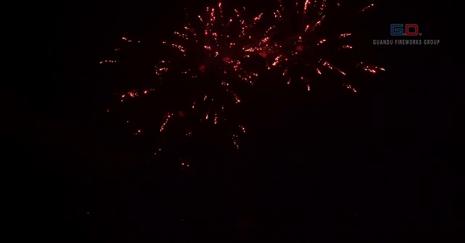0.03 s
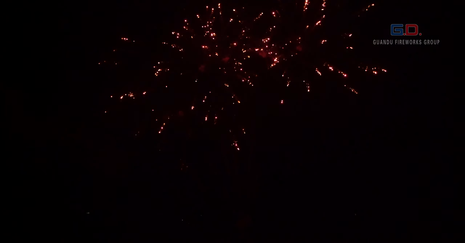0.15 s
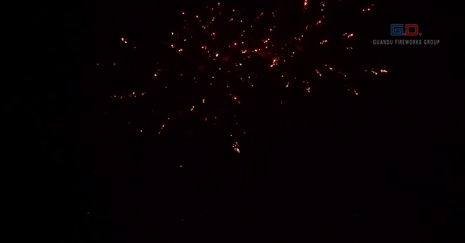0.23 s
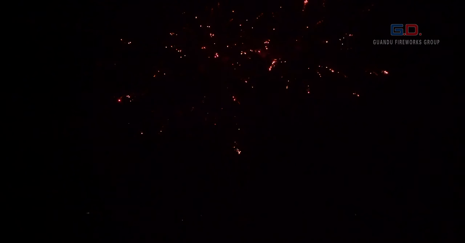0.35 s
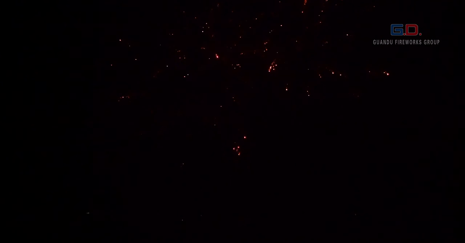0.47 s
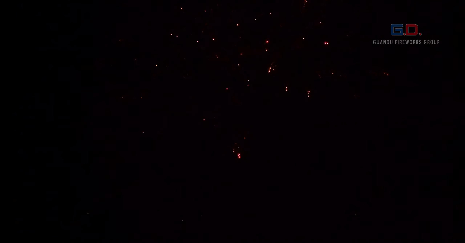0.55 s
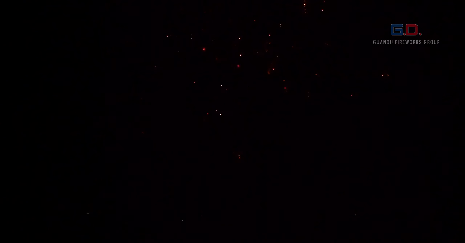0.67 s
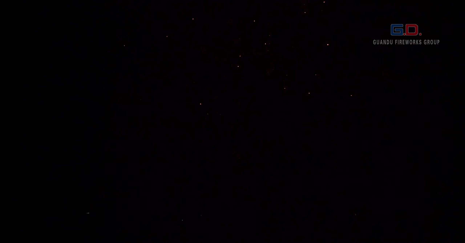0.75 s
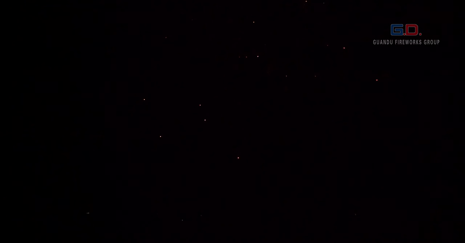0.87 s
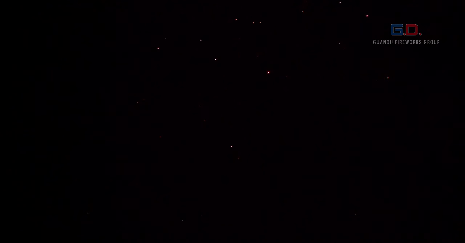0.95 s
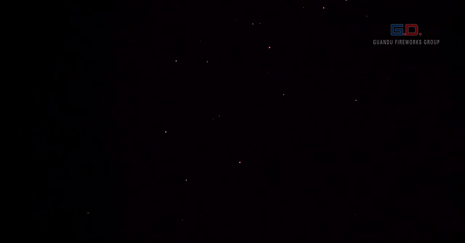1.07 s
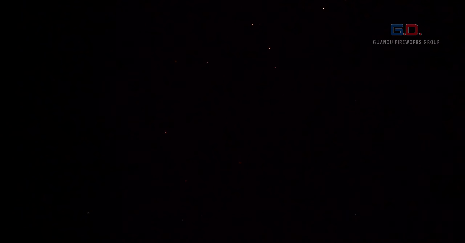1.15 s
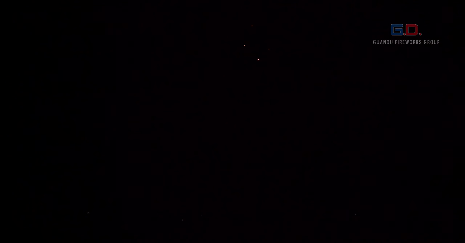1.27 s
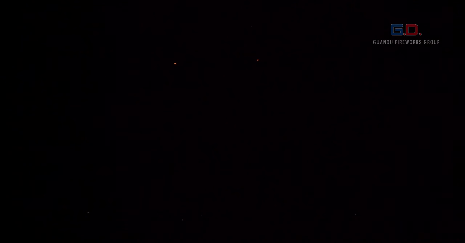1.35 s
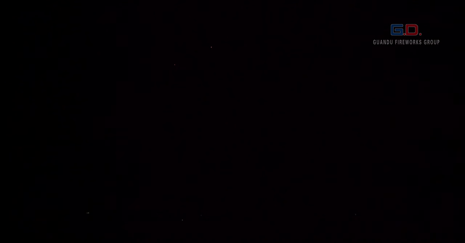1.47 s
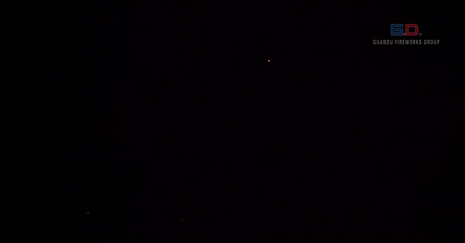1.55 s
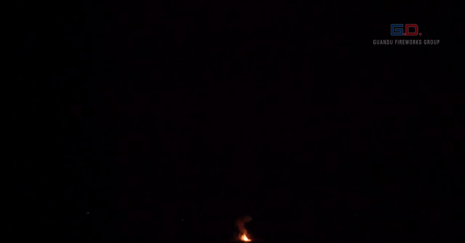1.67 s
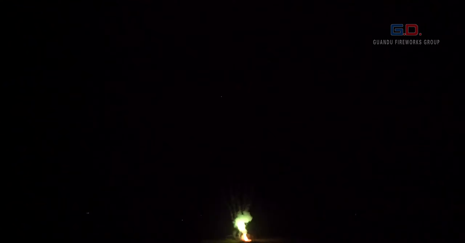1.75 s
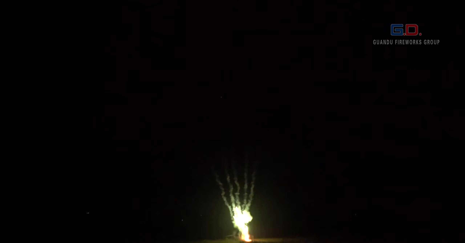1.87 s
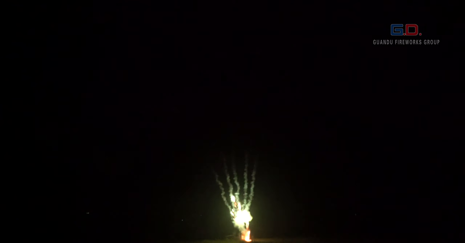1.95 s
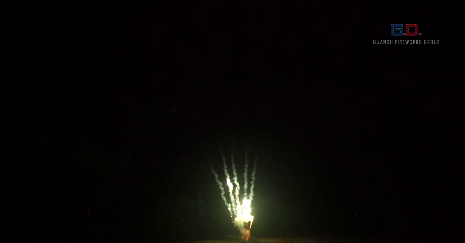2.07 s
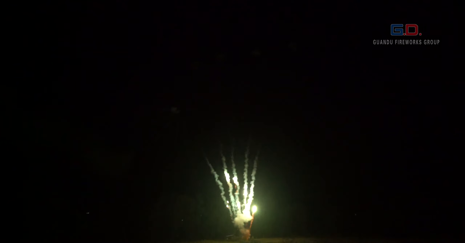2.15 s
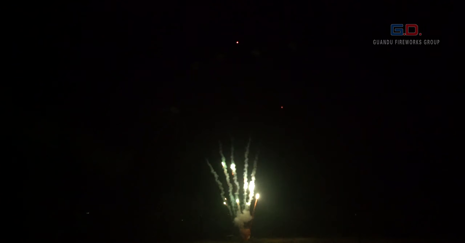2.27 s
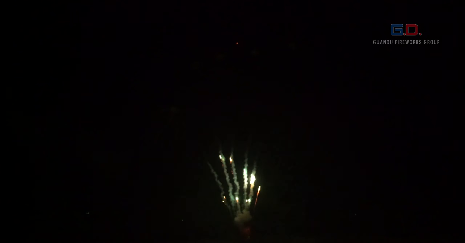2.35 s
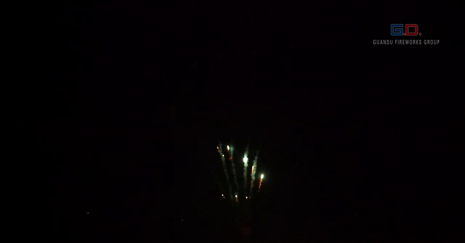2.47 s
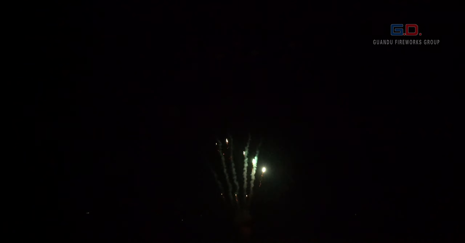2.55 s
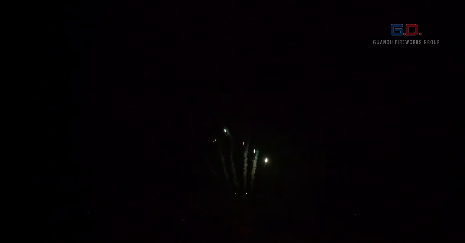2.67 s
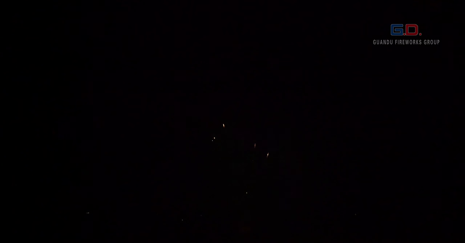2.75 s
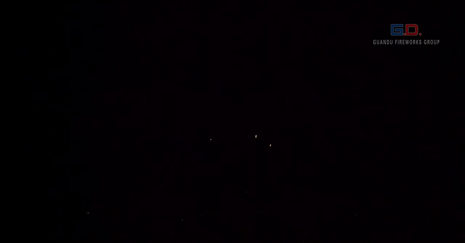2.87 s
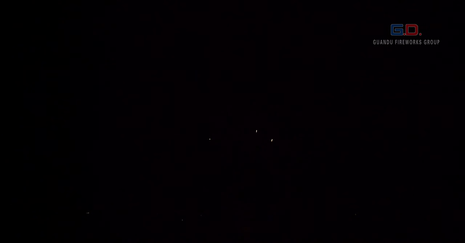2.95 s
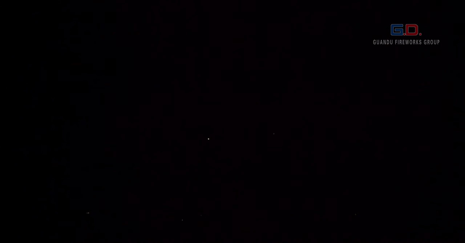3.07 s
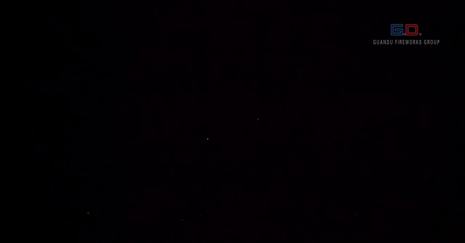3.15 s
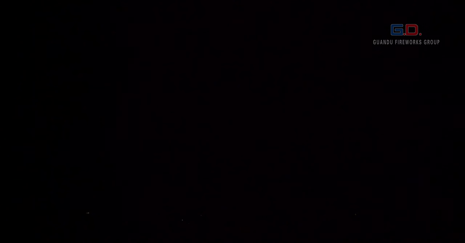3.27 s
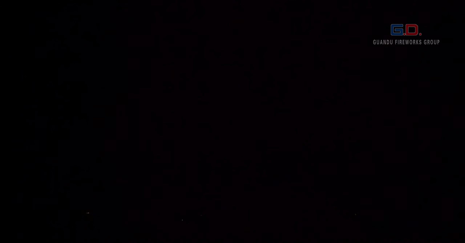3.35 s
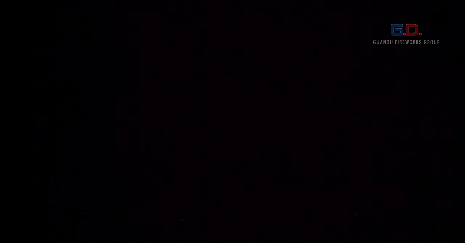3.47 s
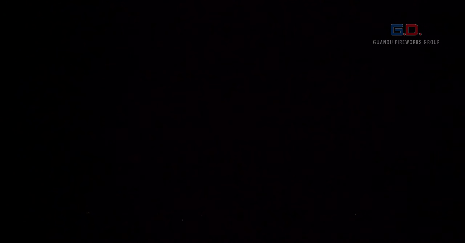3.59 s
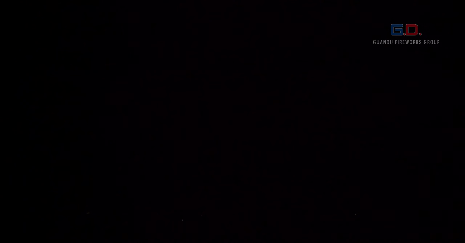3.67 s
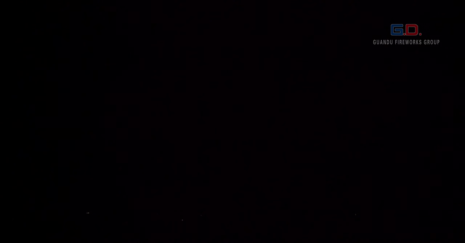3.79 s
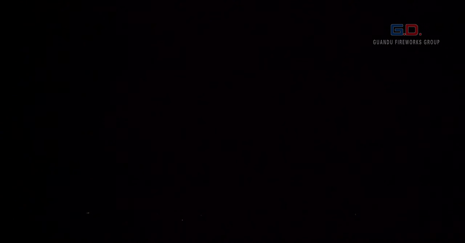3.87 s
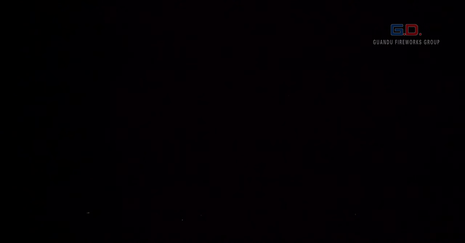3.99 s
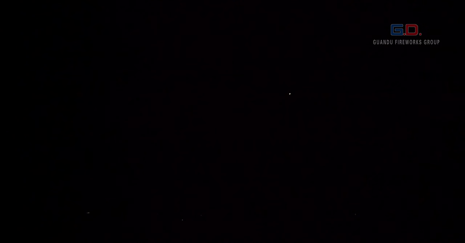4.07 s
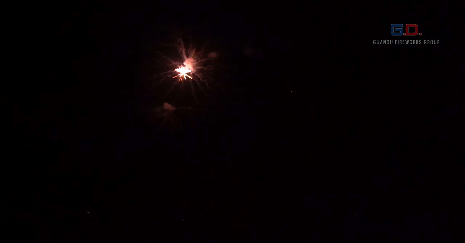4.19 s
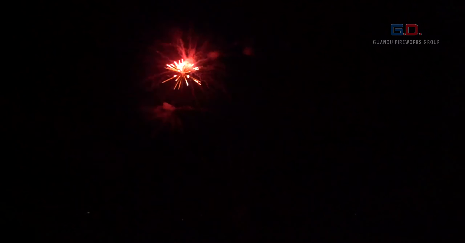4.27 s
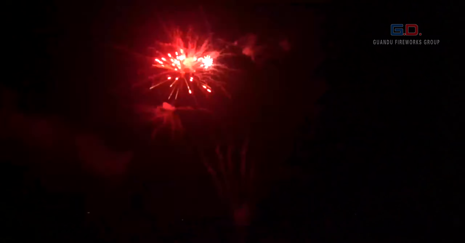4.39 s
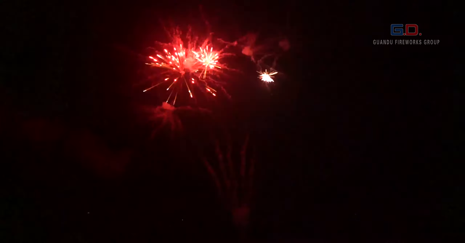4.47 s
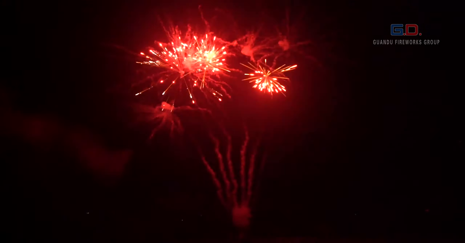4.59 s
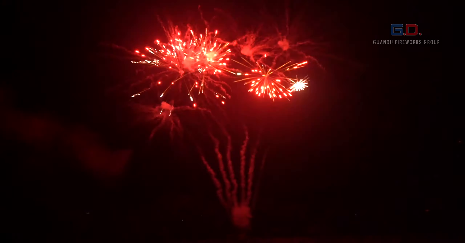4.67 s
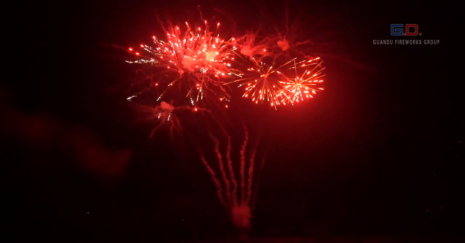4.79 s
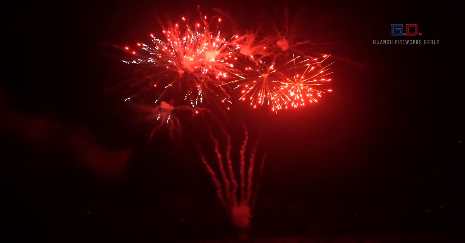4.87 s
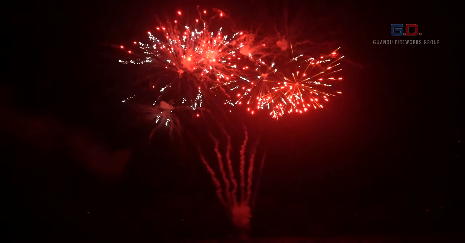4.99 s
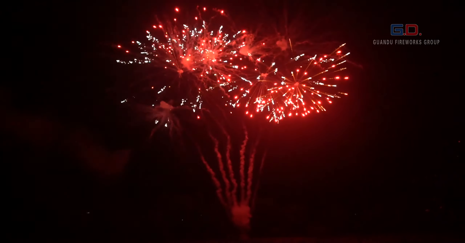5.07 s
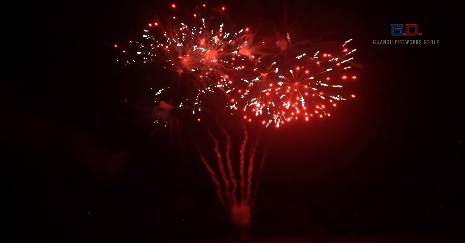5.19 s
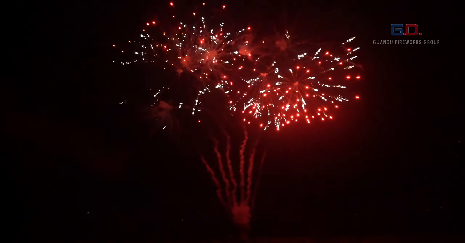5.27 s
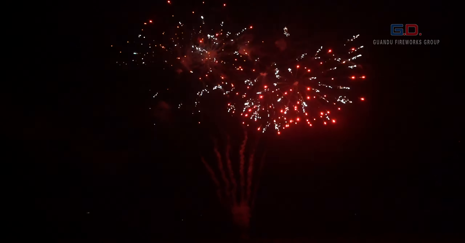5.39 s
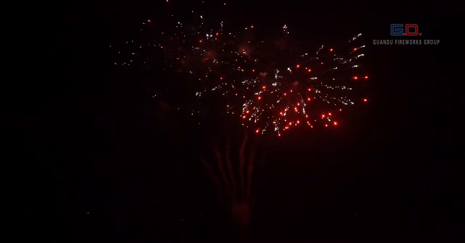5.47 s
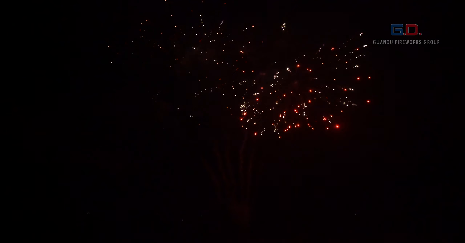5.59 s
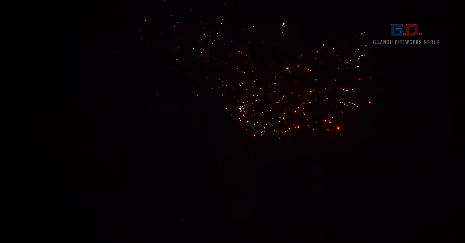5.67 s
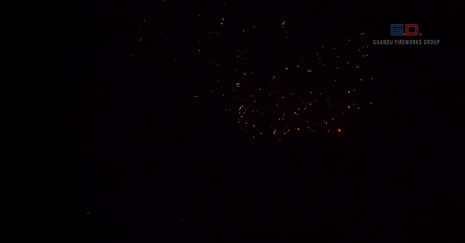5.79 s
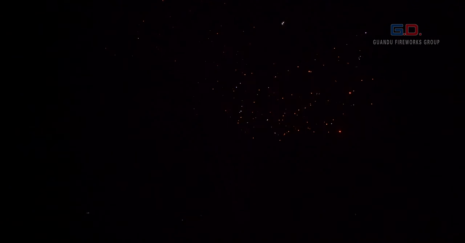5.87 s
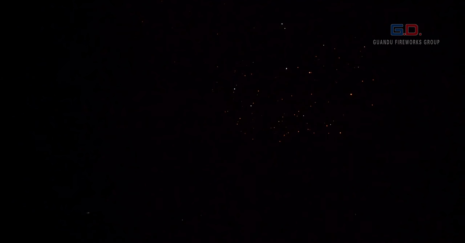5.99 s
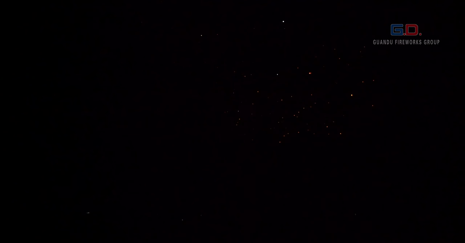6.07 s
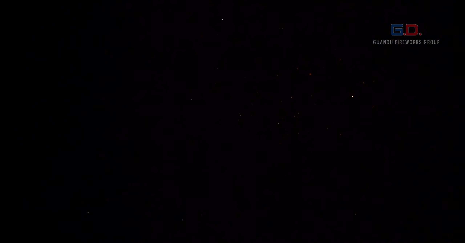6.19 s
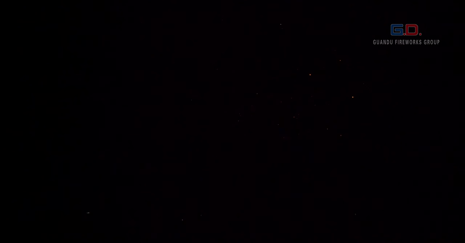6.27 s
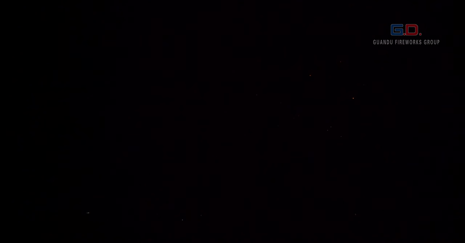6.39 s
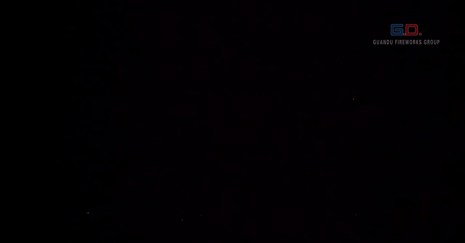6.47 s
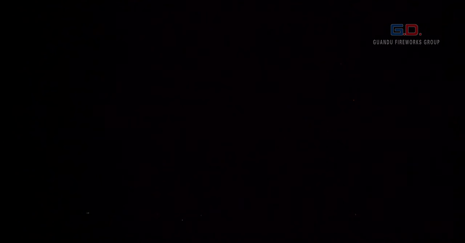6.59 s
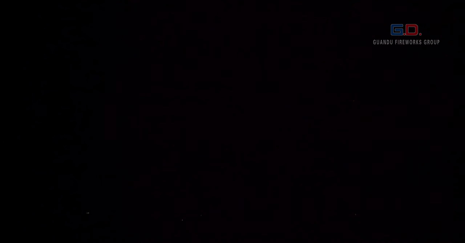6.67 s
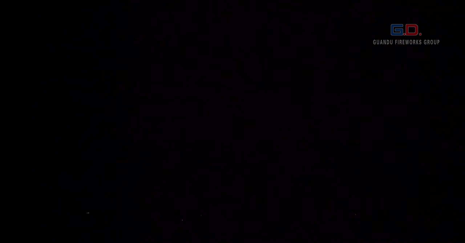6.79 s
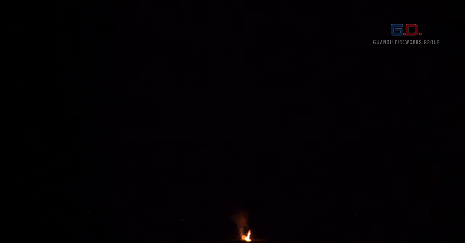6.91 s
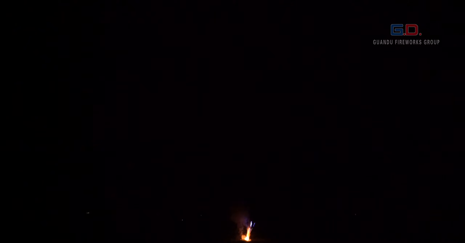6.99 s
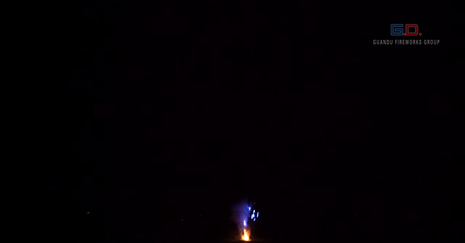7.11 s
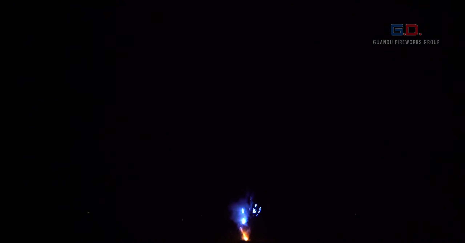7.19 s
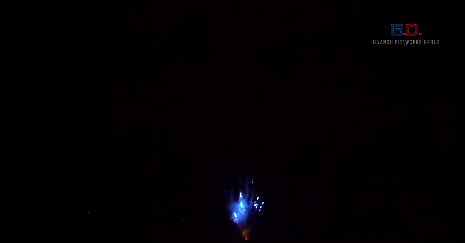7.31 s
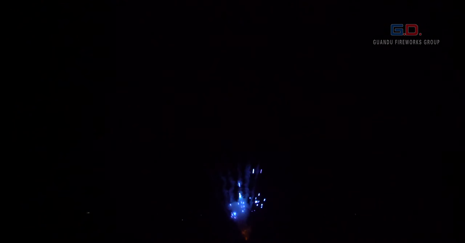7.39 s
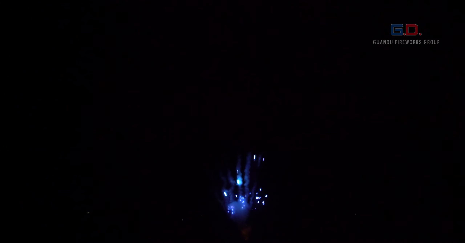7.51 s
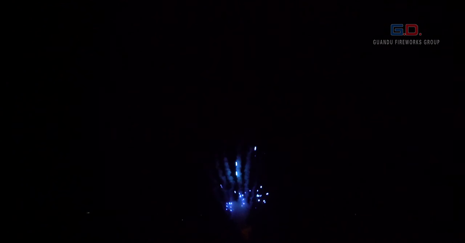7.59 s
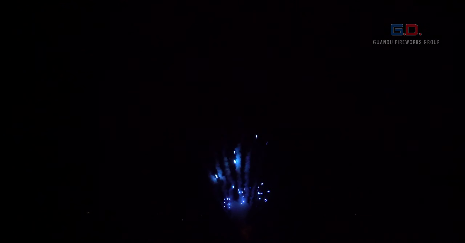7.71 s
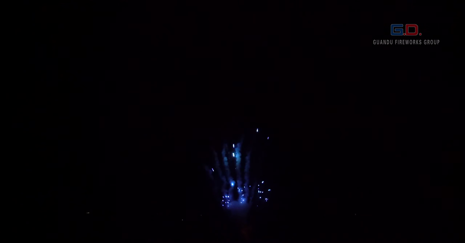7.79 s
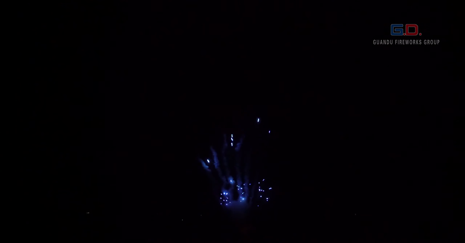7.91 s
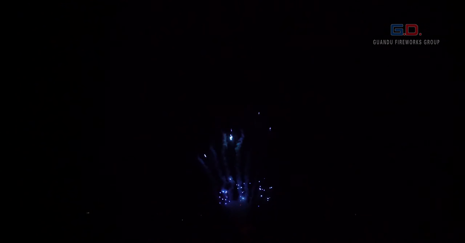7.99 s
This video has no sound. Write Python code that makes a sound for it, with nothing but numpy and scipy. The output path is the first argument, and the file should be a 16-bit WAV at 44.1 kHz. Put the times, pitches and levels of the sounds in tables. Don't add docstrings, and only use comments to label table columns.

```python
import sys
import numpy as np
from scipy import signal
from scipy.fft import rfft, irfft, next_fast_len
from scipy.io import wavfile
from scipy.ndimage import map_coordinates

SR = 44100
rng = np.random.default_rng(int(sys.argv[2]) if len(sys.argv) > 2 else 0)


def dump(signal):
    limited = np.clip(np.atleast_2d(signal).T, -1, 1)
    pcm = np.round(limited * 32767).astype(np.int16)
    wavfile.write(sys.argv[1], SR, pcm)


def decibels_to_gain(level_db):
    exponent = np.asarray(level_db, float) / 20
    return 10 ** exponent


N = 355005

# start_s, peak_db, jet_db, scatter_db
LIFTS = [
    (2.0669, -5, -16.5, -17.5),
    (2.1403, -5.5, -15, -18.5),
    (2.2016, -8.5, -16.5, -20),
    (2.2474, -8, -33, -22),
    (2.3084, -7, -27, -20.5),
    (7.2918, -5, -14.5, -16),
    (7.346, -8, -16, -18),
    (7.406, -6.5, -14.5, -18.5),
    (7.465, -8.5, -11.5, -19),
    (7.52, -6, -15.5, -17),
]
# start_s, peak_db, left_right_db, echo_db
BURSTS = [
    (2.2225, -12.5, -2, -17),
    (4.58, -0.5, 1, 2),
    (4.7904, -2, 4, 0.5),
    (4.8537, -7.5, -6, -3.5),
    (5.0534, -2, -1, -3.5),
    (5.0655, -5, -9, -14.5),
]
# start_s, peak_db, crack_db
FAR_SHOTS = [(0.03, -54, -25), (0.149, -28, -23), (0.438, -29.5, -21), (0.573, -32, -27), (0.632, -29, -35),
             (0.712, -28.5, -19.5), (0.808, -45, -14), (0.883, -34.5, -16), (0.964, -31.5, -20),
             (1.191, -20, -22), (1.492, -29, -27), (1.605, -29, -32), (3.808, -39.5, -9.5),
             (5.774, -27.5, -26), (6.475, -37, -21), (6.525, -28.5, -31), (6.612, -28, -15.5),
             (6.726, -28, -25), (6.813, -21.5, -19.5)]
ROLL_BANDS_HZ = (55, 230, 1200, 4500, 10000)
# freq_hz, density_db_per_hz
ROLL_COLOUR = [(13, -56), (22, -10), (106, -1), (149, -5), (238, -2.5), (363, -4.5), (413, -11), (459, -11),
               (716, -12), (907, -16), (1090, -14.5), (3100, -24.5), (8620, -27), (10600, -30.5),
               (11500, -52), (15000, -86), (22000, -120)]
# pitch_hz, level_db, t60_s
LIFT_THUMP = [(375, -12.5, 0.0025), (1090, 3.5, 0.0032), (2170, -15, 0.0019)]
# pitch_hz, level_db, t60_s
BURST_THUMP = [(414, -2, 0.014), (130, -8, 0.069)]
# delay_s, level_db, dull_above_hz, left_lag_s
LIFT_WALLS = [(.0068, 1.5, 2500, 0.00022)]
# delay_s, level_db, dull_above_hz, left_lag_s
BURST_WALLS = [(.0083, -15, 12000, 0.000168), (0.0102, -13, 9000, 0.00047), (0.0133, -8.5, 9000, .0003),
               (.021, -12, 4000, 0.00024)]
# delay_s, level_db, width_s, left_lag_s
LIFT_BOOMS = [(.0027, -9.5, 0.0014, 0.00049), (.0096, -5.5, 0.0011, 0.00034), (0.0192, -5.5, .001, 0.00055),
              (0.0225, -12, 0.00098, .0003), (0.0298, -9.5, .0009, .0004), (.0409, -10.5, 0.0014, 0.00042),
              (.049, -14, 0.0021, 0.00077)]
# start_s, length_s, level_db
CHIRPS = [(0.478, .1, -65), (0.801, .15, -67), (1.155, .15, -67), (1.95, .15, -68), (2.718, .15, -62),
          (3.011, .2, -62), (3.345, .15, -62), (3.655, .15, -59.5), (3.976, .2, -58), (4.327, .15, -58.5),
          (5.89, .15, -69), (6.208, .15, -69), (6.5, .2, -68), (6.815, .15, -67), (7.118, .15, -69),
          (7.945, .1, -62)]
# pitch_hz, width_hz, level_db
CHORUS_BANDS = [(2946, 380, -4.5), (5500, 1000, -18.5)]
# freq_hz, density_db_per_hz
NIGHT_COLOUR = [(15, -46), (25, -16), (245, 0), (410, -8), (617, -8), (840, -23.5), (2800, -19.5),
                (3630, -31.5), (5470, -28), (10400, -34.5), (11500, -43), (15000, -95), (22000, -120)]
# freq_hz, likeness_0_to_1
ALIKE = [(40, .9), (80, .97), (250, .95), (700, .75), (1400, .62), (2800, .47), (5600, .4), (10000, .33)]
# freq_hz, difference_db
LEAN = [(60, .4), (350, .8), (700, 1.8), (1400, 2), (2800, 2.9), (5600, 2.6), (10000, 1.5)]
# freq_hz, lead_rad
TURN = [(50, -.55), (180, -.7), (350, -.85), (700, -.95), (1400, -.8), (2800, -1.0)]
# pitch_hz, width_hz, level_db
YARD = [(120, 18, 4), (191.5, 12.5, 6.5), (286, 75, 2.5), (365, 12, 3), (619, 80, 2)]
# pitch_hz, width_hz, level_db
TUBE = [(3050, 800, 7), (6100, 900, 6)]
# start_s, echo_db
EARLIER_BURST = (-0.56, -1.5)
# level_db, swell_s, t60_s, late_db, late_t60_s
LIFT_ECHO = [
    (-26.5, 0.047, 1.18, -24, 5),
    (-25, 0.024, 0.59, -54, 2.7),
    (-28.5, 0.005, 1.07, -13.5, 2.2),
    (-34.5, 0.017, 1.38, -26, 1.9),
    (-40.5, 0.01, 0.93, -27, 2.2),
]
# level_db, swell_s, t60_s, late_db, late_t60_s
BURST_ECHO = [
    (-32, 0.1, 2.1, -25, 4),
    (-11, 0.019, 1.2, -20.5, 4.5),
    (-20, .003, 1.16, -15.5, 2.57),
    (-29, 0.0035, 1.46, -25, 2.7),
    (-32.5, 0.0039, 1.08, -50, 1.4),
]
FAN_ECHO_DB = (0.5, 2)
# time_s, level_db
RUMBLE = [(0, -41), (.6, -43.5), (1.1, -38.5), (1.7, -40), (2.0, -43), (2.9, -47.5), (3.6, -50.5),
          (4.5, -52), (6.0, -48.5), (6.4, -47.5), (6.8, -39.5), (7.2, -41.5), (8.05, -46.5)]
# mean_level_db, share_of_swing
RUMBLE_BANDS = [(-69, 1), (-45.5, 1.0), (-53, 0.51), (-67, 0.22), (-103, .3)]
# time_s, gain_db
GAIN = [(0, -5), (.5, -5.5), (1.0, -8.5), (1.9, -6), (2.8, -3), (3.6, -1.5), (4.5, 0.5), (5.8, -6),
        (6.3, -7), (7.2, -5.5), (8.05, -3.5)]

FRONTS_S, FRONTS_WIDE_S, FRONTS_DB = 0.042, 0.01, (-5, -3, -4.5, -30, -14)
KNEE_DB, SQUEEZE = -22.5, 0.32
ECHO_STEP_S = .001
FIZZ_DB, FIZZ_T60_S, FIZZ_LOW_HZ = -59, 4.5, 2500
CHORUS_DB, CHORUS_SWING, NIGHT_DB = -57.5, 1.87, -45.5
LEFT_LAG_S = 6e-5
TOP_HZ = 11250
HALF = np.array([[.5], [-.5]])


def unit(x):
    return x / np.sqrt(np.mean(x ** 2) + 1e-20)


def along(points, hz):
    f, v = np.transpose(points)
    return np.interp(np.log(hz + 1), np.log(f + 1), v)


def curves(rows):
    s, *cols = np.transpose(rows)
    return [np.interp(np.arange(N) / SR, s, c) for c in cols]


def wobble(rate_hz):
    knots = rng.standard_normal(int(N * rate_hz / SR) + 4)
    return map_coordinates(knots, [np.arange(N) * rate_hz / SR])


def filtered(x, response):
    m = next_fast_len(x.shape[-1] + 8192)
    spectrum = rfft(x, m) * response(np.fft.rfftfreq(m, 1 / SR))
    return irfft(spectrum, m)[..., :x.shape[-1]]


def resonances_db(peaks, f):
    return sum(db / (1 + ((f - hz) / width_hz * 2) ** 2) for hz, width_hz, db in peaks)


def spread(pair):
    def mid_side(f):
        angle = np.arccos(np.clip(along(ALIKE, f), 0, 1)) / 2
        return np.array([np.cos(angle), np.sin(angle)])

    mid, side = filtered(pair, mid_side)
    ports = np.array([mid + side, mid - side])
    return filtered(ports, lambda f: np.exp(1j * HALF * along(TURN, f)))


def add(out, sound, start_s):
    room = out[..., round(start_s * SR):][..., :sound.shape[-1]]
    room += sound[..., :room.shape[-1]]


def echo_power(shots, rule, t, fronts_db=-99):
    db, swell_s, t60_s, late_db, late_t60_s = rule
    start_s, shot_db = np.transpose(shots)[:, :, None]
    age = np.maximum(t - start_s, 0)
    fade = decibels_to_gain(-60 * age / t60_s) ** 2 + decibels_to_gain(late_db - 60 * age / late_t60_s) ** 2
    lump = decibels_to_gain(fronts_db) ** 2 * np.exp(-((age - FRONTS_S) / FRONTS_WIDE_S) ** 2)
    swell = (1 - np.exp(-age / swell_s)) ** 2
    return np.sum(decibels_to_gain(db + shot_db) ** 2 * swell * (fade + lump), axis=0)


def rolling_echoes():
    strong = (rng.random((2, N)) < 500 / SR) * rng.standard_normal((2, N))
    returns = spread(rng.standard_normal((2, N)) + 0.5 * unit(strong))
    returns = returns * decibels_to_gain(0.6 * wobble(25) + 0.9 * wobble(70))

    t = np.arange(0, N / SR, ECHO_STEP_S)
    shells = [EARLIER_BURST] + [(s, echo_db) for s, _, _, echo_db in BURSTS]
    tubes = [(row[0], row[1] + FAN_ECHO_DB[2 * k // len(LIFTS)]) for k, row in enumerate(LIFTS)]
    near = np.array([echo_power(tubes, lift, t) + echo_power(shells, burst, t, db)
                     for lift, burst, db in zip(LIFT_ECHO, BURST_ECHO, FRONTS_DB)])
    near = near / (1 + near.sum(axis=0) / decibels_to_gain(KNEE_DB) ** 2) ** SQUEEZE

    out, rumble_db = 0, curves(RUMBLE)[0]
    for k, (far_db, swing) in enumerate(RUMBLE_BANDS):
        far = decibels_to_gain(far_db + swing * (rumble_db - rumble_db.mean())) ** 2
        share = np.transpose([ROLL_BANDS_HZ, np.arange(len(near)) == k])
        colour = lambda f: decibels_to_gain(along(ROLL_COLOUR, f) + resonances_db(YARD, f)) * along(share, f)
        band = unit(filtered(returns, colour))
        out = out + np.sqrt(np.interp(np.arange(N) / SR, t, near[k]) + far) * band
    return out


def fizz():
    band = lambda f: f * f / (f * f + FIZZ_LOW_HZ ** 2) / (1 + (f / 8000) ** 2)
    hiss = unit(filtered(spread(rng.standard_normal((2, N))), band))
    return decibels_to_gain(FIZZ_DB - 60 * np.arange(N) / SR / FIZZ_T60_S + 1.5 * wobble(31)) * hiss


def night():
    wings = lambda f: sum(decibels_to_gain(db) / (1 + ((f - hz) / width_hz * 2) ** 2)
                          for hz, width_hz, db in CHORUS_BANDS)
    chorus = unit(filtered(spread(rng.standard_normal((2, N))), wings) * decibels_to_gain(0.64 * wobble(40)))
    air = unit(filtered(spread(rng.standard_normal((2, N))), lambda f: decibels_to_gain(along(NIGHT_COLOUR, f))))
    gain_db, = curves(GAIN)
    return decibels_to_gain(CHORUS_DB + CHORUS_SWING * gain_db) * chorus + decibels_to_gain(NIGHT_DB + gain_db) * air


def puff(low_hz, high_hz, rise_s, t60_s):
    t = np.arange(SR // 4) / SR
    band = lambda f: f / (f + low_hz) / (1 + (f / high_hz) ** 3)
    noise = unit(filtered(spread(rng.standard_normal((2, len(t)))), band))
    return noise * (1 - np.exp(-t / rise_s)) * decibels_to_gain(-60 * t / t60_s)


def far_fireworks():
    out = np.zeros((2, N))
    boom = lambda f: 1j * f * 170 / (235 ** 2 - f * f + 1j * f * 170)
    for start_s, db, crack_db in FAR_SHOTS:
        roll = filtered(puff(low_hz=100, high_hz=544, rise_s=0.0024, t60_s=0.13), boom)
        add(out, decibels_to_gain(db + 1.0) * roll, start_s)
        crack = puff(low_hz=600, high_hz=1700, rise_s=0.0008, t60_s=0.16)
        add(out, decibels_to_gain(db + crack_db + 3) * crack, start_s - .003)
    return out


def cricket():
    out, stroke_s = np.zeros(N), .052
    t = np.arange(round(.042 * SR)) / SR
    pitch_hz = 4600 - 520 * (t / t[-1]) ** 1.73
    stroke = np.sin(2 * np.pi * np.cumsum(pitch_hz) / SR) * np.sin(np.pi * t / t[-1]) ** 0.3
    for start_s, length_s, db in CHIRPS:
        for k in range(round(length_s / stroke_s)):
            add(out, decibels_to_gain(db - 2) * stroke, start_s + k * stroke_s)
    smear = out + 0.45 * np.roll(out, 430) + 0.5 * np.roll(out, 910)
    return smear * np.array([1.4 + wobble(400), 0.4 + wobble(400)])


def shock(thump, walls, spike_db, spike_s):
    t = np.arange(SR // 8) / SR
    wave = sum(decibels_to_gain(db - 60 * t / t60_s) * np.sin(2 * np.pi * hz * t) for hz, db, t60_s in thump)
    wave = wave - decibels_to_gain(spike_db) * np.exp(-t / spike_s)

    def arrivals(f):
        late = lambda left_s, right_s: np.exp(-2j * np.pi * f * np.array([[left_s], [right_s]]))
        direct = late(LEFT_LAG_S, 0)
        return direct + sum(decibels_to_gain(db) * late(s + lag_s, s) / (1 + 1j * f / dull_hz) ** 2
                            for s, db, dull_hz, lag_s in walls)

    return filtered(wave, lambda f: arrivals(f) * 1j * f / (1j * f + 90))


def lifts():
    out = np.zeros((2, N))
    pop = shock(LIFT_THUMP, LIFT_WALLS, spike_db=4, spike_s=.0001)
    for delay_s, db, width_s, lag_s in LIFT_BOOMS:
        u = (np.arange(pop.shape[1]) / SR - delay_s - HALF * lag_s) / width_s
        pop = pop - decibels_to_gain(db) * (1 - u * u) * np.exp(-u * u / 2)
    mouth = lambda f: decibels_to_gain(resonances_db(TUBE, f) - 3.0)
    for start_s, db, jet_db, scatter_db in LIFTS:
        add(out, decibels_to_gain(db + 1) * filtered(pop, mouth), start_s)
        jet = filtered(puff(low_hz=1490, high_hz=7800, rise_s=0.0037, t60_s=0.34), mouth)
        add(out, decibels_to_gain(db + jet_db) * jet[:, :320], start_s - .0073)
        scatter = filtered(puff(low_hz=886.0, high_hz=5500, rise_s=0.0012, t60_s=0.14), mouth)
        add(out, decibels_to_gain(db + scatter_db) * scatter, start_s)
    return out


def bursts():
    out = np.zeros((2, N))
    bang = shock(BURST_THUMP, BURST_WALLS, spike_db=4, spike_s=.00006)
    stray = shock(BURST_THUMP[:1], [], spike_db=0, spike_s=0.00073)
    for start_s, db, pan_db, _ in BURSTS:
        add(out, decibels_to_gain(db - 0.5 + pan_db * HALF) * bang, start_s)
        for when, size, side in rng.random((9, 3)):
            stray_db = db - 7.5 - 60 * when * 0.11 - 4.8 * size
            stray_pan_db = 8.8 * (side + 0.5)
            add(out, decibels_to_gain(stray_db + stray_pan_db * HALF) * stray, start_s + .016 + .12 * when)
    return out


def scene():
    mix = rolling_echoes() + fizz() + night() + far_fireworks() + cricket() + lifts() + bursts()
    return filtered(mix, lambda f: decibels_to_gain(HALF * along(LEAN, f)))


def roll_off(x):
    return signal.sosfilt(signal.butter(12, 11800, fs=SR, output="sos"), x)


def record(dry):
    soft = dry / (1 + np.abs(dry / .72) ** 2.6) ** (1 / 2.6)
    finished = filtered(soft, lambda f: 1 / (1 + (f / TOP_HZ) ** 150))
    return roll_off(finished)


dry = scene()
out = record(dry)
dump(out)
```